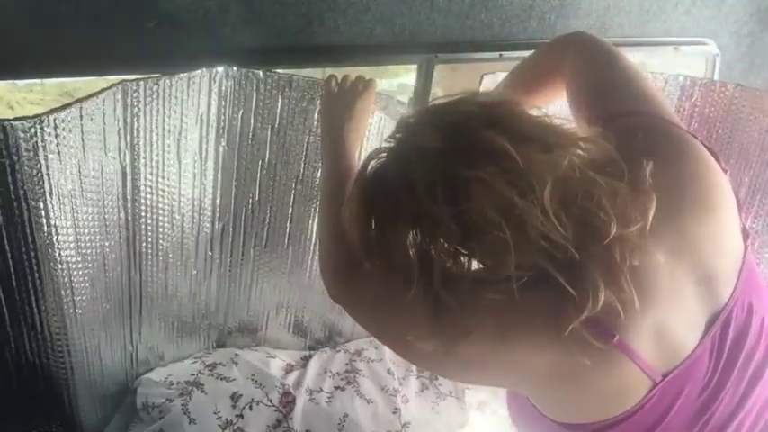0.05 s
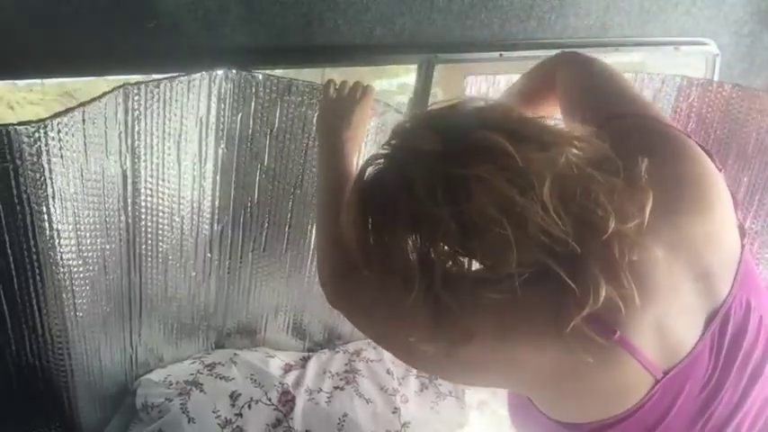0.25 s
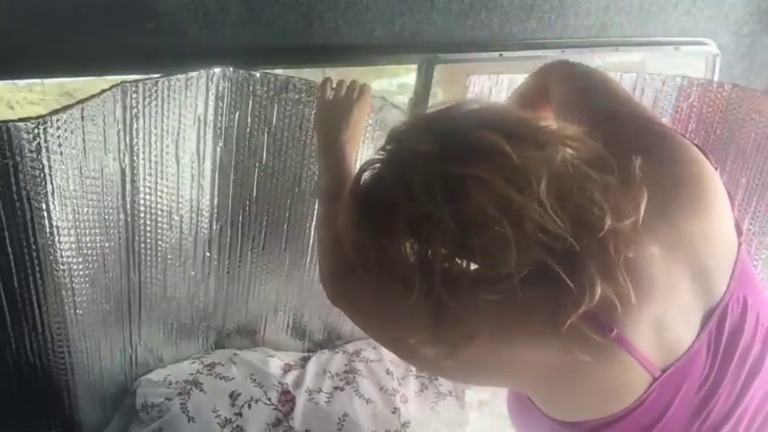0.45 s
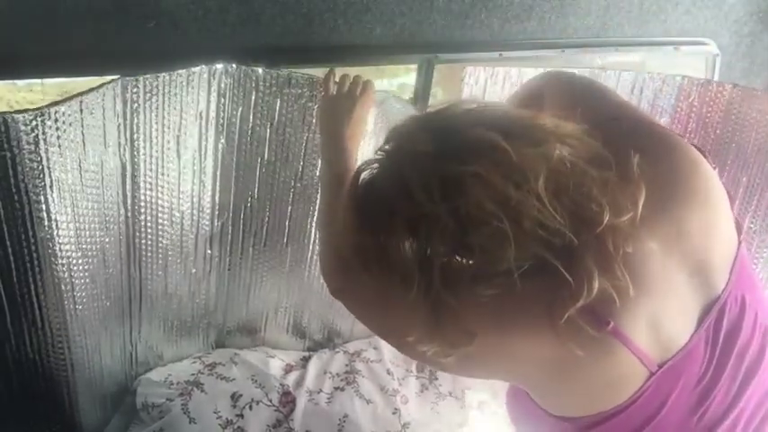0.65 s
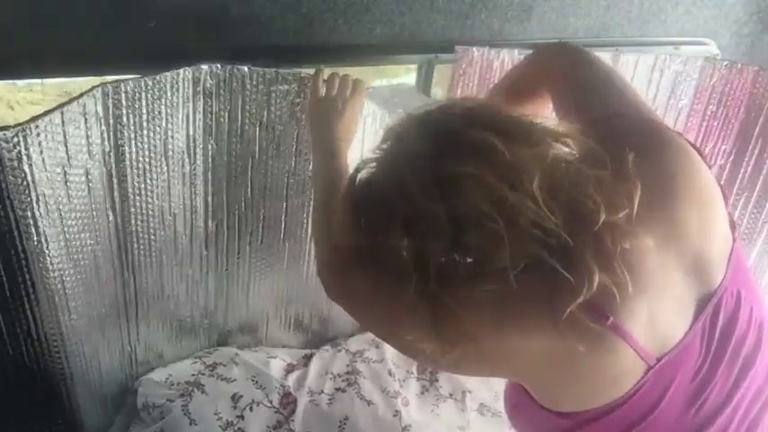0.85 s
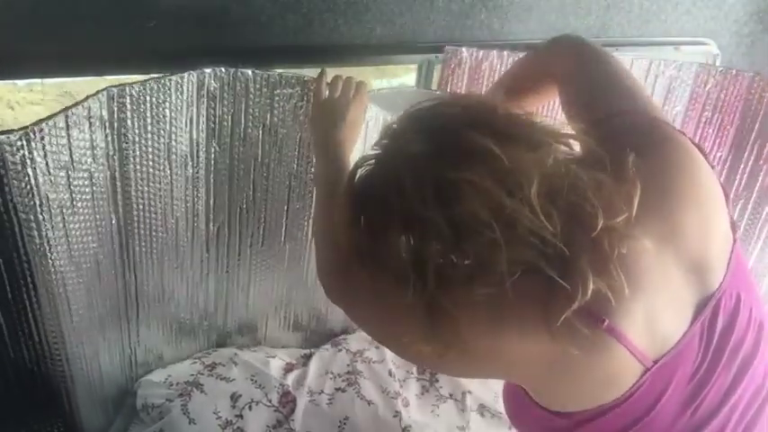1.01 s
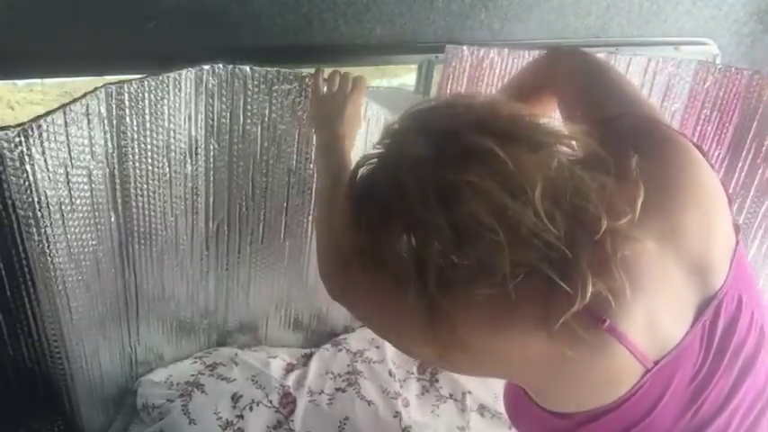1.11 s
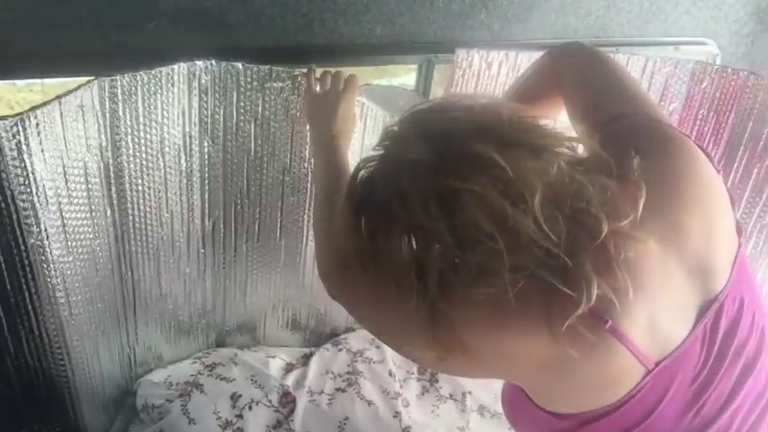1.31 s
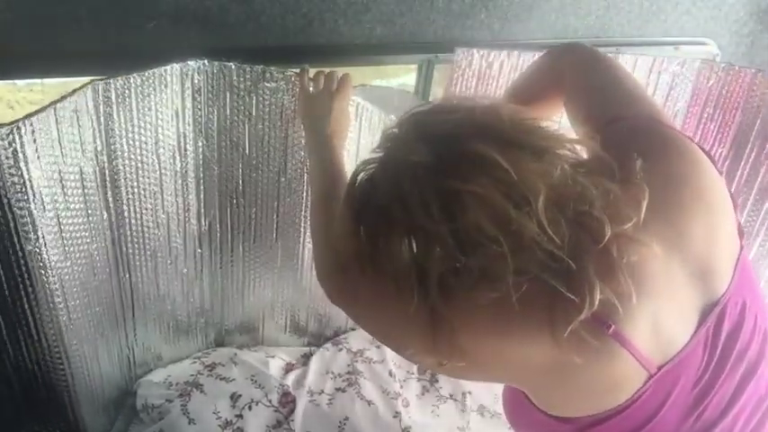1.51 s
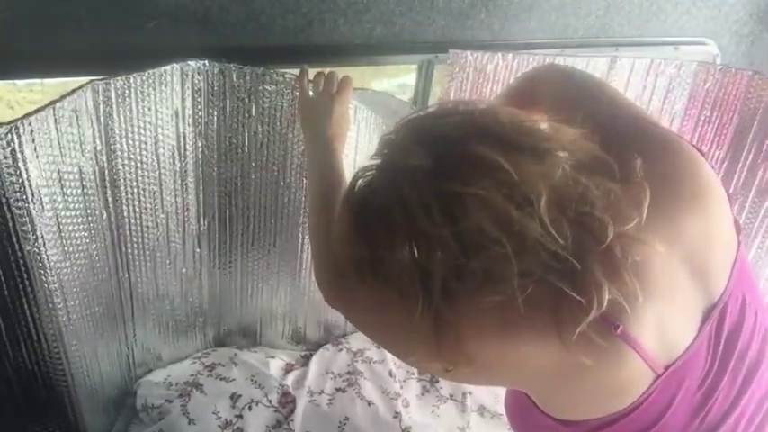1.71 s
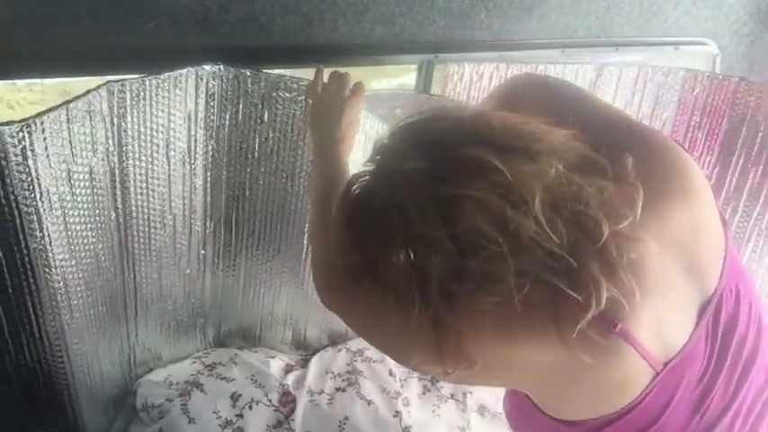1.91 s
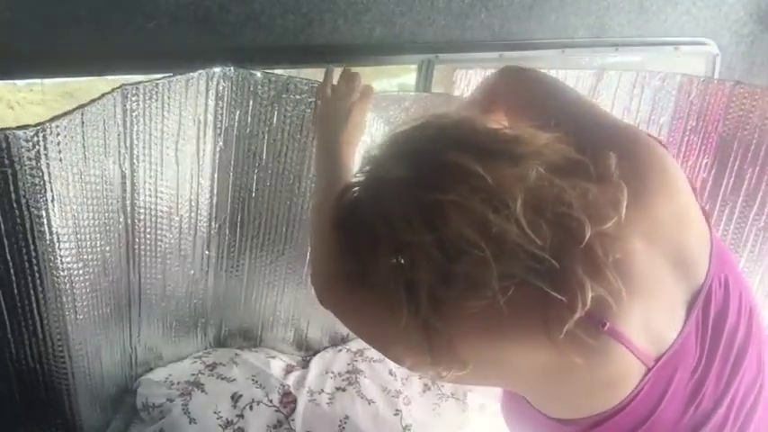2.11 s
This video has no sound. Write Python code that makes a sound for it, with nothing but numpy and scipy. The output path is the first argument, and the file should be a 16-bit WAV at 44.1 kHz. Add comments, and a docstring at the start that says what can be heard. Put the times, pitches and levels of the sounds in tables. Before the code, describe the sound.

Foil insulation crinkles and rustles as hands press it into a vehicle window.

```python
"""Hands press a foil-faced bubble insulation panel into a window inside a parked vehicle.
First the foil slides and crinkles by friction, and its creases snap in a loud cluster while soft
pushes set the wall thudding. Near one second the sheet buckles with dull pops that fall in pitch,
since bending waves carry high frequencies faster. After a lull the rubbing returns with faint
stick-slip squeaks and a last pop. A faint low rumble lies under it all."""
import sys
import numpy as np
from scipy import signal
from scipy.fft import rfft, irfft, next_fast_len
from scipy.io import wavfile
from scipy.ndimage import uniform_filter1d

SR = 44100
rng = np.random.default_rng(int(sys.argv[2]) if len(sys.argv) > 2 else 0)


def generate_wav(signal):
    """Clip the signal to [-1, 1] and save it as 16-bit WAV at the path in sys.argv[1]."""
    frames = np.transpose(np.atleast_2d(signal))
    scaled = np.clip(frames, -1, 1) * 32767
    pcm = np.round(scaled).astype(np.int16)
    wavfile.write(sys.argv[1], SR, pcm)


N = 94815
RESPONSE_SAMPLES = 8192

# creases snapping over: start_s, level_db, tilt_db_per_octave, treble_edge_hz, ring_db
CREASE_SNAPS = [(0.1341, -42, 3, 6940, -10), (0.1742, -43, 1, 6000, -15), (.2063, -39, 0.5, 5030, -24),
                (0.2374, -44, -0.5, 6000, -1), (.2835, -40, -0.5, 5000, -3), (0.296, -36.5, 0, 5000, 23),
                (.3404, -22.5, .5, 5330, 0), (0.3628, -24, -2, 6800, -2), (0.3685, -29.5, 3, 9400, 2.5),
                (0.3717, -29.5, -1.5, 7000, -2), (.3972, -25, 0.5, 3540, 1), (0.4016, -27, -0.5, 3870, 3),
                (0.5099, -42.5, -4, 6000, 6), (.5518, -43.5, -2, 7000, 1), (0.5694, -45, -1, 4347, -10),
                (0.7171, -47, -1, 8000, 11), (.8770, -43, -2.5, 3900, -4), (0.9428, -28.5, 0.3, 3950, -3),
                (1.0722, -44.5, 7, 5030, -14), (1.1433, -48.5, -2, 8150, 1.5), (1.5076, -49, -3.5, 7000, 8),
                (1.6628, -51, 4, 4200, 0), (1.9709, -44, 2.5, 8000, 1)]
# the sheet buckling: start_s, level_db, centre_hz, half_width_octaves, delay_at_1khz_s
SHEET_BUCKLES = [(.3990, -43.5, 258, 0.28, .002), (0.9404, -33, 326, 0.46, 0.00203),
                 (1.067, -37, 636, 0.89, 0.0052), (1.505, -47.5, 304, 0.82, 0.00323),
                 (1.8720, -40, 560, 1.9, .0105)]
# strength of the sliding noise over time: time_s, body_db, scrape_db, fizz_db
SLIDE_ENVELOPES = [(0.0, -65.5, -60.5, -64.5), (0.06, -64, -60.5, -65), (0.108, -57, -54, -58),
                   (0.18, -55, -48.5, -54), (0.235, -49, -49, -56.5), (0.265, -54.5, -54.5, -57.5),
                   (0.331, -44, -45.5, -51), (0.385, -46.5, -45.5, -53), (0.45, -56.5, -54.5, -55.5),
                   (0.55, -59, -52.5, -57), (0.63, -63, -54.5, -60), (0.68, -64, -56, -62.5),
                   (0.73, -59.5, -54, -56.5), (0.81, -56.0, -50.5, -53), (0.855, -54.5, -53.5, -57),
                   (0.92, -53, -55, -56), (0.995, -56, -50, -53), (1.07, -60.0, -56.0, -60.0),
                   (1.1, -64.5, -60.5, -63.5), (1.16, -65.5, -55.5, -59.5), (1.25, -64, -57, -63.5),
                   (1.31, -68, -65, -67.5), (1.41, -69, -64, -68), (1.455, -69, -68, -70),
                   (1.53, -58.5, -57, -58), (1.555, -62.5, -58.5, -61), (1.59, -66, -65.5, -68.0),
                   (1.62, -70, -61, -65.5), (1.65, -59, -56, -63.5), (1.73, -59.5, -56, -61),
                   (1.79, -51, -50.5, -58), (1.85, -55, -50.5, -56.5), (1.903, -53, -46, -48.5),
                   (1.94, -58.5, -54, -59.5), (2.01, -55.5, -54.0, -58), (2.052, -53, -50, -52.5),
                   (2.09, -63, -57, -61.0), (2.15, -60.0, -52.5, -59.5)]
# bursts of crinkling under the fingers: centre_s, sigma_s, level_db
SCRUNCH_SWELLS = [(0.291, 0.012, -44.5), (0.52, 0.0046, -42.5), (.560, 0.0072, -44.5),
                  (0.884, 0.014, -49.5), (0.952, 0.022, -48), (1.685, 0.0089, -47.5), (1.88, 0.0075, -38)]
# squeaks of rubbed foil: centre_s, sigma_s, level_db
SQUEAK_SWELLS = [(1.694, 0.024, -58), (1.803, 0.0059, -53), (1.824, 0.0049, -46)]
# pushes against the wall: start_s, gain_db
HAND_PUSHES = [(.055, -52), (0.131, -56.5), (0.226, -49), (0.286, -43.5), (0.34, -45), (.522, -38.5),
               (0.943, -48), (1.13, -55), (1.513, -58), (1.893, -54.5)]
# normal modes of the wall: frequency_hz, gain_db, t60_s
WALL_MODES = [(45, 3, 0.4), (66.7, 4, 0.19), (110, -0.5, 0.109), (170.7, -2.5, 0.21)]
# normal modes of the panel: frequency_hz, bandwidth_hz, peak_db
PANEL_MODES = [(235, 79, -14), (301, 37, 3), (793, 42, -2.5), (862, 62, 5.5), (1059, 54, 6.5),
               (1360, 26, -5), (1640, 24, -8), (1723, 70, -2.5), (3060, 20, 0.5), (3120, 47, 4.5),
               (3430, 51, -12), (3780, 20, -35), (4440, 300, 0.5), (5860, 43, 3.5)]
# spectrum of the panel's broad click: frequency_hz, gain_db
CLICK_SPECTRUM = [(60, -0.5), (250, -3.5), (550, -17.5), (850, -5.5), (1700, 0.5), (2300, -4), (3500, 1),
                  (4500, -15), (5300, -8.5), (8000, -14.5), (12000, -21)]
# papery midrange of the friction noise: frequency_hz, gain_db
BODY_SPECTRUM = [(60, -12), (200, -10), (320, 0.5), (450, -9), (660, -10), (780, -3), (1080, 0), (1350, -4),
                 (1750, -3.5), (2200, -5.5), (3000, -12.5), (6000, -40)]
# upper midrange of the friction noise: frequency_hz, gain_db
SCRAPE_SPECTRUM = [(800, -36), (2000, -11.5), (2700, -4), (3350, -1), (3800, -4), (4350, -2.5),
                   (4950, -11.5), (5600, -9.5), (7000, -31), (12000, -37.5)]
# treble of the friction noise: frequency_hz, gain_db
FIZZ_SPECTRUM = [(1000, -52), (4000, -22.5), (5200, -1.5), (6100, 1.5), (7000, -2), (8400, -6), (10200, -9),
                 (11300, -8.5), (12000, -14.5)]
# spectrum of the background: frequency_hz, gain_db
RUMBLE_SPECTRUM = [(18, -27), (31, -18), (43, 0), (55, -10.5), (72, 0), (100, -11.5), (160, -10.5),
                   (240, -23), (500, -27.5), (2000, -30), (11000, -51)]
# reverberation time of the cabin: frequency_hz, t60_s
CABIN_DECAY = [(150, 0.083), (600, 0.081), (3000, 0.037), (10000, 0.027)]


def crease_snaps():
    """Snap-through: a crease releases elastic energy into the panel as an impulse and a brief crackle."""
    out, t = np.zeros(N), np.arange(RESPONSE_SAMPLES) / SR
    crackle_t60_s = 0.013
    for start_s, level_db, tilt_db, edge_hz, ring_db in CREASE_SNAPS:
        crackle = rng.standard_normal(RESPONSE_SAMPLES) * amp(-60 * t / crackle_t60_s)
        force = amp(-6.5) * unit_energy(crackle)
        force[0] += 1  # the impulse
        treble_shelf = pulse(lambda hz: 10 * np.log10(0.15 + 1 / (1 + (hz / edge_hz) ** 14)))
        snap = through(through(force, treble_shelf), panel_response(tilt_db, ring_db))
        add(out, start_s, at_level(disperse(snap, delay_s=0.000583), level_db))
    return out


def sheet_buckles():
    """Buckling: the sheet pops through with a band-limited pulse, which dispersion makes fall in pitch."""
    out = np.zeros(N)
    for start_s, level_db, centre_hz, octaves, delay_s in SHEET_BUCKLES:
        pop = pulse(lambda hz: -10 * np.log10(1 + (np.log2((hz + 1) / centre_hz) / octaves) ** 6))
        falling_pop = cabin(disperse(pop, delay_s), wet_db=-9)
        add(out, start_s, at_level(falling_pop, level_db))
    return out


def sliding_foil():
    """Sliding friction: foil on the wall gives a papery body with crinkles, a scrape and a fine fizz."""
    time_s, *curves_db = np.transpose(SLIDE_ENVELOPES)
    body_gain, scrape_gain, fizz_gain = [amp(np.interp(np.arange(N) / SR, time_s, db)) for db in curves_db]
    ticks = foil_ticks(per_s=400, spread_db=4.5)
    crinkle = unit_rms(through(ticks, panel_response(tilt_db=3.5, ring_db=-4)))
    body = body_gain * (friction_noise(BODY_SPECTRUM) + amp(-5.5) * crinkle)
    scrape = scrape_gain * friction_noise(SCRAPE_SPECTRUM)
    fizz = fizz_gain * friction_noise(FIZZ_SPECTRUM)
    return body + amp(-0.5) * (scrape + fizz)


def finger_scrunches():
    """Impulse excitation: dense ticks swell and fade in the panel as the fingers squeeze it."""
    ticks = foil_ticks(per_s=2500, spread_db=5) * swells(SCRUNCH_SWELLS)
    return through(ticks, unit_energy(panel_response(tilt_db=0.15, ring_db=2)))


def wall_thuds():
    """Damped free vibration: each soft push sets the low modes of the wall booming."""
    out, t = np.zeros(N), np.arange(SR // 2) / SR
    boom = sum(amp(db - 60 * t / t60_s) * np.sin(2 * np.pi * hz * t) for hz, db, t60_s in WALL_MODES)
    attack = 1 - np.exp(-t / 0.0031)
    for start_s, gain_db in HAND_PUSHES:
        add(out, start_s, amp(gain_db) * boom * attack)
    return out


def foil_squeaks():
    """Stick-slip oscillation: the foil catches and releases for a moment on one wavering note."""
    pitch_hz = 3420 * (1 + 0.012 * wander(samples=150))
    phase = 2 * np.pi * np.cumsum(pitch_hz) / SR
    return unit_rms(np.sin(phase)) * swells(SQUEAK_SWELLS)


def rumble():
    """Stationary filtered noise: a low background with a trace of hiss."""
    return amp(-60) * unit_rms(shape_spectrum(rng.standard_normal(N), RUMBLE_SPECTRUM))


def friction_noise(spectrum):
    """Shot noise: dense slips of the foil merge into a slightly fluttering hiss of rms 1."""
    flutter_db = 2 * wander(samples=500)
    slips = foil_ticks(per_s=7000, spread_db=3) * amp(flutter_db)
    return unit_rms(cabin(shape_spectrum(slips, spectrum), wet_db=-9))


def foil_ticks(per_s, spread_db):
    """A Poisson process: independent tiny impulses of uneven size and either sign, rms 1."""
    size = amp(spread_db * np.minimum(rng.standard_normal(N), 2))
    occurs = rng.random(N) < per_s / SR
    polarity = np.sign(rng.standard_normal(N))
    return unit_rms(occurs * polarity * size)


def panel_response(tilt_db, ring_db):
    """Modal superposition: a tick yields a broad click and a brief ring, tilted by tilt_db per octave."""
    t = np.arange(RESPONSE_SAMPLES) / SR
    modes = sum(amp(db) * width_hz * np.exp(-np.pi * width_hz * t) * np.cos(2 * np.pi * hz * t)
                for hz, width_hz, db in PANEL_MODES)
    low_pass = pulse(lambda hz: -10 * np.log10(1 + (hz / 5000) ** 6))
    ring = amp(ring_db) * unit_energy(through(modes, low_pass))
    click = cabin(pulse(lambda hz: along(CLICK_SPECTRUM, hz)), wet_db=-3.5)
    tilt = pulse(lambda hz: tilt_db * np.log2(np.clip(hz, 200, 9000)))
    return through(click + ring, tilt)


def disperse(x, delay_s):
    """Bending-wave dispersion: group delay varies as 1 / sqrt(frequency) and is delay_s at 1 kHz."""
    hz = np.fft.rfftfreq(RESPONSE_SAMPLES, 1 / SR)
    return irfft(rfft(x) * np.exp(-4j * np.pi * delay_s * np.sqrt(1000 * hz)))


def cabin(x, wet_db):
    """Reverberation: the cramped cabin adds a short diffuse tail whose treble dies first."""
    hz, t, noise = signal.stft(rng.standard_normal(RESPONSE_SAMPLES), SR, nperseg=128)
    decay = amp(-60 * t / along(CABIN_DECAY, hz)[:, None])
    _, tail = signal.istft(noise * decay, SR, nperseg=128)
    return x + amp(wet_db) * through(x, unit_energy(tail))


def pulse(gain_db):
    """Minimum phase: the most compact causal pulse with the spectral shape gain_db(hz), energy 1."""
    hz = np.fft.rfftfreq(RESPONSE_SAMPLES, 1 / SR)
    cepstrum = irfft(np.log(np.maximum(amp(gain_db(hz)), 1e-6)))
    cepstrum[1:RESPONSE_SAMPLES // 2] *= 2  # fold onto positive time
    cepstrum[RESPONSE_SAMPLES // 2 + 1:] = 0
    return unit_energy(irfft(np.exp(rfft(cepstrum))))


def shape_spectrum(x, spectrum):
    """Linear filtering by a table of gain against frequency."""
    return through(x, pulse(lambda hz: along(spectrum, hz)))


def swells(rows):
    """A sum of Gaussian envelopes, each a smooth rise and fall."""
    t = np.arange(N) / SR
    return sum(amp(db) * np.exp(-0.5 * ((t - centre_s) / sigma_s) ** 2) for centre_s, sigma_s, db in rows)


def wander(samples):
    """A moving average of noise: slow random fluctuation of rms 1."""
    return unit_rms(uniform_filter1d(rng.standard_normal(N), size=samples))


def at_level(x, db):
    """Equal energy: give a transient the energy of 5 ms of steady sound at this level."""
    return amp(db) * unit_energy(x) * np.sqrt(SR / 200)


def through(x, response):
    """Convolution, keeping the length of x."""
    return signal.fftconvolve(x, response)[:len(x)]


def add(out, start_s, x):
    """Superposition of x onto out from start_s."""
    i = max(0, round(start_s * SR))
    out[i:i + len(x)] += x[:len(out) - i]


def along(points, hz):
    """Interpolation of (frequency_hz, value) points on a logarithmic frequency axis."""
    points_hz, values = np.transpose(points)
    return np.interp(np.log(hz + 1), np.log(points_hz + 1), values)


def amp(db):
    """Decibels to amplitude ratio."""
    return 10 ** (np.asarray(db) / 20)


def unit_rms(x):
    """Normalisation to rms 1."""
    return x / np.sqrt(np.mean(x ** 2) + 1e-20)


def unit_energy(x):
    """Normalisation to energy 1."""
    return x / (np.linalg.norm(x) + 1e-20)


def scene():
    """Superposition: the pressures of all sources add at one close point."""
    foil = crease_snaps() + sheet_buckles() + finger_scrunches() + foil_squeaks() + sliding_foil()
    return (foil + wall_thuds() + rumble())[None]


def record(dry):
    """Band limiting: the deepest bass and the highest treble are removed."""
    low_cut_hz, top_hz = 39.5, 11850
    high_passed = signal.sosfilt(signal.butter(4, low_cut_hz, "high", fs=SR, output="sos"), dry)
    size = next_fast_len(N + RESPONSE_SAMPLES)
    passband = np.fft.rfftfreq(size, 1 / SR) < top_hz
    return irfft(rfft(high_passed, size) * passband, size)[..., :N]


dry = scene()
out = record(dry)
generate_wav(out)
```